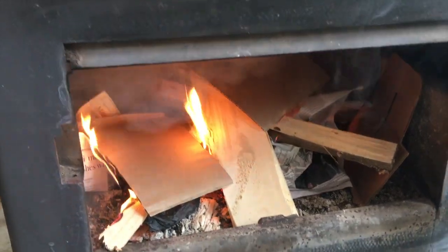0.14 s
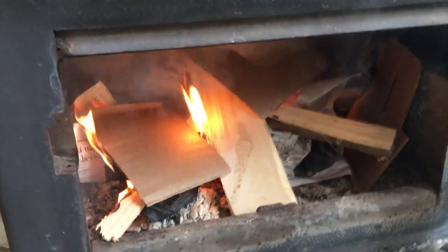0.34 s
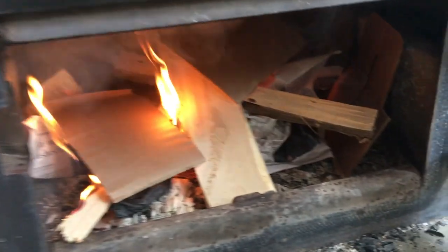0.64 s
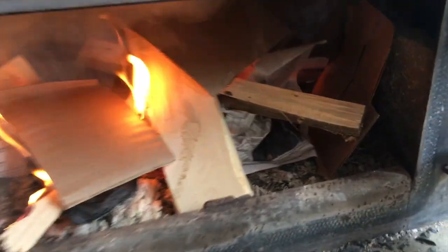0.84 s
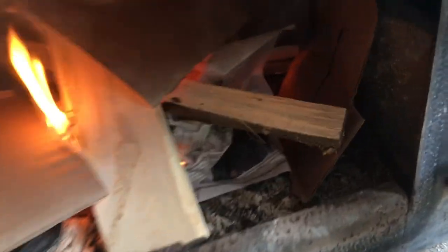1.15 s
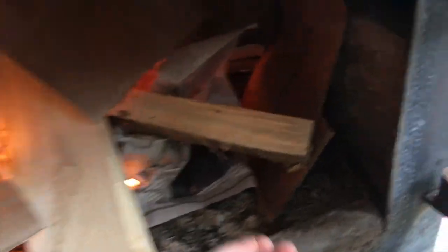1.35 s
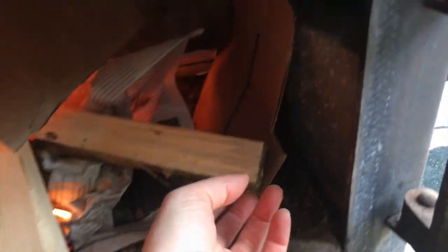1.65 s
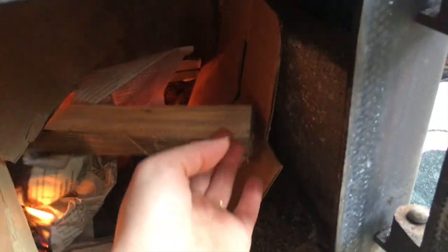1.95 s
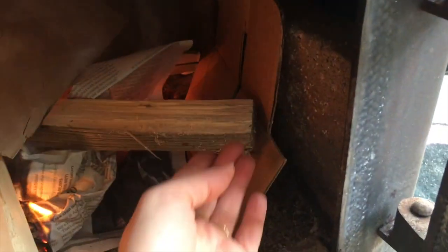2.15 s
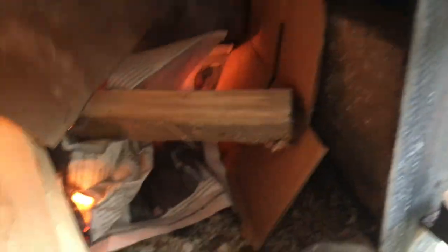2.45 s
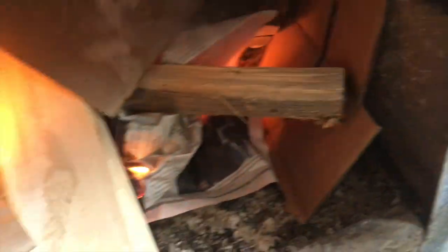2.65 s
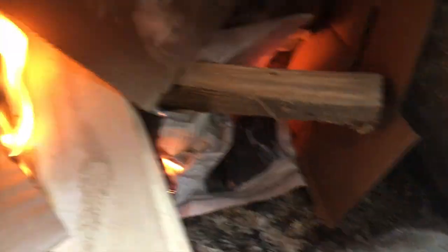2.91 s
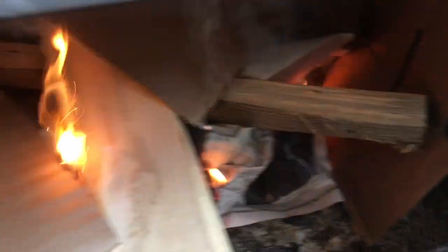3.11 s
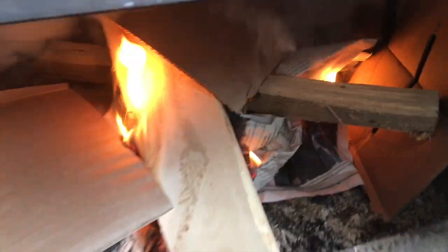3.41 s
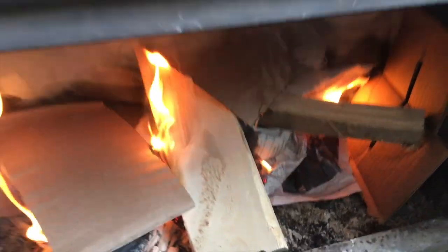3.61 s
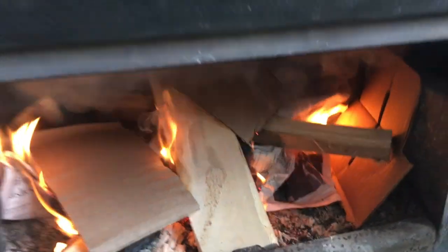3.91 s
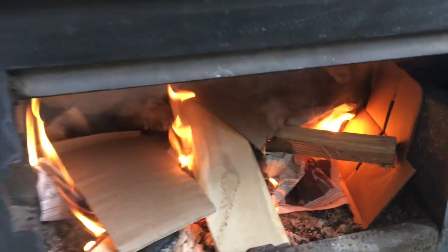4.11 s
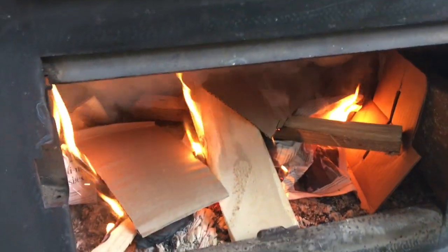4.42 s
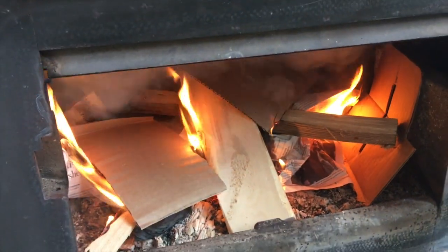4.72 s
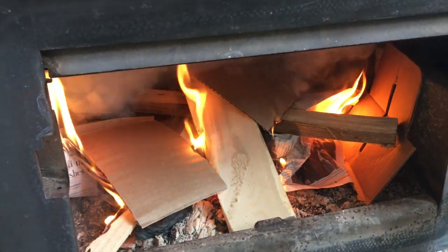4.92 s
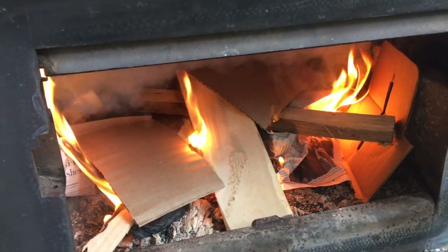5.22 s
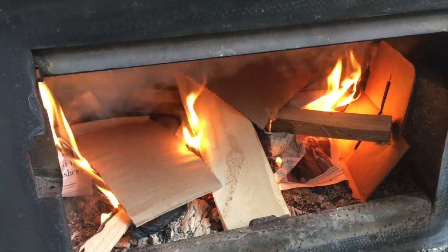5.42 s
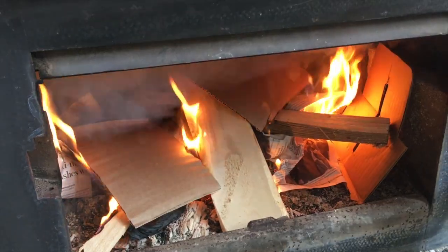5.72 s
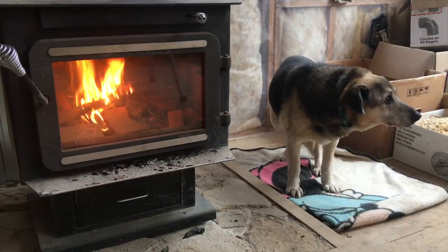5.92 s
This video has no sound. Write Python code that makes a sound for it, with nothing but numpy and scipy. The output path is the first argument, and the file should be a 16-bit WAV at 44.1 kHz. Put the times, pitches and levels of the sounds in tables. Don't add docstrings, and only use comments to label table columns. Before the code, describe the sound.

Paper, card and kindling burn right in front of a hand-held phone, with bright irregular snaps, tiny fibre ticks and bassy puffs of flame. After a far wood knock, an arm rustles and a log scrapes in crunchy stick-slip bursts. A bumping pop comes next, then light hollow rubbing, a sharp spit and two very loud pops close together. Crackling continues with late spits, before an abrupt change to a quiet low flue hum.

```python
import sys
import numpy as np
from scipy import signal
from scipy.fft import rfft, irfft, next_fast_len
from scipy.io import wavfile
from scipy.ndimage import uniform_filter1d

SR = 44100
rng = np.random.default_rng(int(sys.argv[2]) if len(sys.argv) > 2 else 0)


def rack_gain(trim_db):
    fader = np.asarray(trim_db, float)
    return 10 ** (fader / 20)


def inscribe(sig):
    pcm = np.round(np.clip(np.atleast_2d(sig).T, -1, 1) * 32767)
    wavfile.write(sys.argv[1], SR, pcm.astype(np.int16))


N = 267113
SIZE = 2048
FIREBOX_T60 = .022

# [f/Hz, density/dB]
CARD_COLOUR = [(1760, -17), (3000, -6.5), (4800, -10), (5740, 2), (7420, -5), (10500, -4.5), (14200, 0.5),
               (16000, -9), (16500, -41)]


def colour(x, points):
    hz, db = np.transpose(points)
    n = next_fast_len(len(x))
    f = np.maximum(np.arange(n // 2 + 1) * SR / n, 1)
    gain_db = np.interp(np.log(f), np.log(hz), db, left=db[0] - 20, right=db[-1] - 20)
    y = irfft(rfft(x, n) * rack_gain(gain_db), n)[:len(x)]
    return y / np.sqrt(np.mean(y ** 2))


def band(x, lo_hz, hi_hz, order=2):
    sos = signal.butter(order, [lo_hz, min(hi_hz, .45 * SR)], "band", fs=SR, output="sos")
    return signal.sosfilt(sos, x)


def walk(rate):
    hold = int(SR / rate)
    steps = np.repeat(rng.standard_normal(N // hold + 1), hold)
    return 0.54 * uniform_filter1d(uniform_filter1d(steps, hold), hold)[:N]


def fade(t, t60):
    return (t >= 0) * rack_gain(-60 * np.maximum(t, 0) / t60)


def swell(t, start, length, edge):
    ramp_s = length * np.clip(edge, .05, 1) / 2
    ramp = np.clip(np.minimum(t - start, start + length - t) / ramp_s, 0, 1)
    return np.sin(np.pi / 2 * ramp) ** 2


def add(track, s, sound):
    i = int(s * SR)
    track[i:i + len(sound)] += sound[:N - i]


def grains(rate, spread_db):
    size_db = spread_db * np.minimum(rng.exponential(size=N), 3)
    return (rng.random(N) < rate / SR) * rng.standard_normal(N) * rack_gain(size_db)


def flames(t):
    # [t/s, flutter level/dB]
    strength = [(0, -66.5), (.4, -75), (.57, -65.5), (1.2, -67), (1.6, -52), (2.4, -54), (3.08, -57),
                (3.21, -63.5), (3.27, -57), (3.62, -56.5), (3.76, -61), (4.2, -56), (4.5, -61),
                (4.69, -64.5), (5.16, -62), (5.4, -59), (5.93, -56.5)]
    # [centre t/s, length/s, flutter level/dB, flap level/dB]
    puffs = [(0.15, 0.24, -61, -65), (0.34, 0.31, -62, -64.5), (0.489, 0.035, -52, -69),
             (0.712, 0.35, -58.5, -76), (0.976, 0.51, -52, -65.5), (1.27, 0.28, -60.5, -68),
             (1.56, .25, -60, -89), (1.874, 0.099, -47, -53.5), (2.454, 0.026, -75, -63),
             (2.541, 0.081, -42.5, -50.5), (2.643, 0.044, -48, -69), (3.103, 0.064, -53, -50),
             (3.894, .2, -52.5, -60), (4.098, 0.17, -58, -62), (4.277, 0.069, -48.5, -56),
             (4.46, 0.051, -54, -57), (4.74, 0.044, -50, -90), (5.445, 0.041, -55, -69),
             (5.835, 0.075, -52, -89)]
    # [f/Hz, density/dB]
    flutter_colour = [(12, -31), (26, -3), (45, -5.5), (69, 4.5), (86, 3), (115, 1.5), (151, -10.5),
                      (182, -11), (200, -17), (260, -65), (440, -120)]
    fire_db = np.interp(t, *np.transpose(strength))
    low = rack_gain(fire_db)
    high = rack_gain(-75 + 1.6 * (fire_db + 56))
    for s, length, flutter_db, flap_db in puffs:
        puff = swell(t, s - length / 2, length, 1)
        low = low + rack_gain(flutter_db) * puff
        high = high + rack_gain(flap_db) * puff
    flutter = colour(rng.standard_normal(N), flutter_colour) * low * rack_gain(1.6 * walk(21))
    flap = 12 * band(rng.standard_normal(N), 101, 257.0, order=3) * high * rack_gain(2.0 * walk(25.3))
    return flutter + flap


def off_stove_face(x):
    lag = 0.78 * SR / 1000 * (1 + 0.11 * walk(3.03))
    return x + 0.25 * np.interp(np.arange(N) - lag, np.arange(N), x)


def sleeve_and_hiss(t):
    # [start t/s, length/s, sleeve level/dB]
    moves = [
        (0.547, 0.5, -73.5),
        (0.759, 0.95, -64.5),
        (1.735, 0.47, -66),
        (2.15, 0.51, -64),
        (2.75, 0.41, -63),
        (3.182, 0.6, -66),
        (3.695, 0.39, -76.5),
        (3.827, 0.16, -77.5),
        (4.025, 0.16, -73.5),
        (5.406, 0.4, -85),
    ]
    # [f/Hz, density/dB]
    sleeve_colour = [(180, -26), (300, -1), (451, -24), (580, 5), (765, 2), (1200, 0.5), (1600, 1),
                     (2540, -0.5), (3170, -2), (4190, -4), (4900, -10), (5380, -2), (7000, -7), (9100, -50),
                     (15400, -120)]
    # [f/Hz, density/dB]
    hiss_colour = [(180, 2.5), (300, 6.5), (367, 4), (449, 0.5), (938, -9), (1720, -12), (1960, -4.5),
                   (4850, -11), (7020, -5.5), (10300, -5.5), (11400, -2), (14700, -7.5), (15700, 0),
                   (16500, -16)]
    rest_db, hiss_rest_db, hiss_stirred_db = -80.5, -71, 1
    moving = sum(rack_gain(db) * swell(t, s, length, 0.75) for s, length, db in moves)
    cloth = colour(off_stove_face(grains(6000, 0.52)), sleeve_colour)
    sleeve = cloth * (moving + rack_gain(rest_db)) * rack_gain(1.3 * walk(40))
    smear = rng.standard_normal(256) * fade(np.arange(256) / SR, FIREBOX_T60)
    tiny_ticks = colour(signal.fftconvolve(grains(130, 2.5), smear)[:N], CARD_COLOUR)
    hiss = colour(rng.standard_normal(N), hiss_colour) * rack_gain(0.86 * walk(63)) + rack_gain(-5) * tiny_ticks
    hiss_level = np.hypot(rack_gain(hiss_rest_db + 0.5 * walk(8.7)), rack_gain(hiss_stirred_db) * moving)
    return sleeve + hiss * hiss_level


def crack(x, hz, dull_db):
    return band(x, hz / 3, hz * 3.41) + rack_gain(dull_db + 6.0) * band(x, 310, 4700, order=1)


def crackles():
    # [t/s, peak level/dB, thud level/dB]
    paper = [(0.0353, -46, -18), (0.11, -47, -20), (0.1667, -37.5, -23), (0.507, -49, -18),
             (0.7298, -43, -12), (0.8285, -40, -29), (1.01, -46, -22), (1.055, -39.5, -14),
             (1.591, -30.5, -21.5), (1.6487, -38.5, -11), (2.6873, -40, -5), (2.7556, -36.5, -12),
             (2.8104, -41, -26), (2.969, -33.5, -15), (3.206, -40.5, -32), (3.2787, -33, -12),
             (3.6462, -38.5, -18), (3.731, -49, -17), (3.789, -50, -14), (3.886, -45, -15),
             (4.1916, -34.5, -12.5), (4.6678, -46, -28), (4.79, -39, -26), (5.2607, -45.5, -16),
             (5.2949, -40.5, -25), (5.459, -42, -20), (5.5486, -40, -16), (5.6103, -43.5, -20),
             (5.8263, -38, -16), (5.8499, -43, -20), (4.4315, -45, -20), (5.625, -40, -13),
             (4.114, -40.5, -16)]
    # [t/s, peak level/dB, thud level/dB]
    kindling = [(0.4704, -43.5, -10), (.516, -43.5, -13), (.821, -45.5, 3), (0.9885, -37.5, -9),
                (1.0183, -37.5, -4.5), (1.1917, -38, -15), (1.338, -40, -17), (1.4428, -32.5, -8.5),
                (1.5332, -44.5, -15), (1.6772, -39, -8), (2.8216, -40, -15), (2.9477, -38.5, -10),
                (3.08, -35.5, -7), (3.0917, -36.5, 6), (3.4307, -42, -18), (3.712, -44.5, -7),
                (3.9556, -43.5, -15), (4.1066, -32.5, -21), (4.2544, -35, -10), (4.267, -42, 5),
                (4.7293, -45.5, -7), (4.9073, -45, -11), (4.915, -38.5, -7), (5.0656, -49, -18),
                (5.105, -45, -15), (5.165, -47.5, -14), (5.2856, -41, -15), (5.3012, -39.5, -13),
                (5.775, -41.5, -5), (5.9325, -46.5, -24)]
    # [t/s, peak level/dB, f/Hz]
    creases = [(1.739, -42, 8300), (1.743, -37, 8300), (1.755, -41, 9000), (1.8164, -28, 12000),
               (1.848, -24, 9000), (1.877, -31, 11000), (1.9035, -27, 24000), (2.0344, -34, 28000),
               (2.0447, -27, 8000), (2.114, -33, 9000), (2.224, -37, 12100), (2.238, -36, 18000),
               (2.271, -39.5, 8300), (2.342, -38, 22100), (2.5423, -50, 12000), (2.5543, -38, 10000),
               (2.5838, -44.5, 12000), (2.773, -40, 12000)]
    paper_hz, kindling_hz, pitch_spread = 10900, 11000, 0.28
    splinter_ms, spike = 3.15, 0.64
    rows = [(*row, paper_hz) for row in paper]
    rows += [(*row, kindling_hz) for row in kindling]
    rows += [(s, db, -9.5, hz) for s, db, hz in creases]
    for place, u, v in rng.uniform(0.013, 0.91, (14, 3)):
        rows.append((place * N / SR, -54 + 2.2 * np.log(1 / u), -26 + 12 * v, kindling_hz))
    near, t = np.zeros(N), np.arange(SIZE) / SR
    decay = np.exp(-t * 1000 / splinter_ms) + 0.087 * fade(t, 2 * FIREBOX_T60)
    for s, db, dull_db, hz in rows:
        noise = rng.standard_normal(SIZE)
        splinters = noise * np.abs(noise) ** spike * decay
        sound = crack(splinters, hz * np.exp(pitch_spread * rng.standard_normal()), dull_db)
        add(near, s, rack_gain(db) * sound / np.abs(sound).max())
    return near


def cabin(send):
    # [f/Hz, density/dB]
    tail_colour = [(180, -47), (300, -12), (1060, -11), (2100, -5), (3200, 0), (4600, -2), (6300, -0.5),
                   (13500, -2), (15700, -11), (16500, -26)]
    far_wall_ms, t60 = 33.5, 0.43
    t = np.arange(SR // 2) / SR
    build = np.minimum(t / 0.0026, 1) * fade(t, t60)
    slap = 0.8 * np.exp(-((t - far_wall_ms / 1000) / 0.0055) ** 2)
    tail = colour(rng.standard_normal(len(t)), tail_colour) * (build + slap)
    return signal.fftconvolve(send, tail)[:N]


def bumps():
    # [t/s, peak level/dB, f/Hz, t60/s]
    low_bumps = [(0.385, -44, 81, 0.061), (0.486, -41, 88.5, 0.041), (1.846, -54, 87, 0.023),
                 (2.4507, -30.5, 141, 0.025), (2.539, -37, 71, 0.09), (3.108, -16, 70, 0.049),
                 (3.1041, -20.5, 220, 0.015), (3.44, -38.5, 83, 0.067), (3.598, -39.5, 90.5, 0.088),
                 (3.86, -36.5, 54.8, 0.51), (4.091, -35, 65, 0.093), (4.279, -38, 99, 0.048),
                 (4.459, -28, 113, 0.016), (4.737, -46.5, 89, 0.11), (.105, -50, 175, .18),
                 (.165, -51, 190, .16), (.94, -52, 200, .14), (1.02, -50.5, 186, 0.15),
                 (3.87, -48, 170, .1), (4.09, -47, 180, .08), (4.89, -53.5, 180, 0.095),
                 (4.457, -36, 1020, .02), (4.456, -40, 660, .025), (4.28, -40, 660, .025),
                 (0.059, -66, 56.5, 0.08), (0.111, -54, 99.6, 0.08), (0.21, -48, 96.9, 0.11),
                  (0.278, -46, 102, 0.087), (0.674, -47, 61.9, 0.072), (0.751, -48, 121, 0.12),
                  (0.885, -44, 88, 0.12), (0.979, -46, 86.1, 0.086), (1.078, -52, 96.9, 0.059),
                  (1.494, -45, 78.1, 0.067), (1.588, -43, 120, 0.092), (1.669, -49, 91.5, 0.08),
                  (1.96, -44, 107, 0.1), (2.069, -44, 118, 0.068), (2.169, -39.5, 88, 0.096),
                  (2.624, -42.5, 130, 0.059), (2.909, -52, 120, 0.08), (3.789, -44.5, 88, 0.08),
                  (4.14, -38, 56, 0.11), (4.247, -39, 75.4, 0.08), (4.355, -45.5, 67.3, 0.08),
                  (4.51, -46.5, 88, 0.1), (4.567, -51, 91.5, 0.08), (4.889, -56, 95, 0.08),
                  (5.109, -48, 67, 0.074), (5.284, -60, 111, 0.08), (5.369, -51, 94.2, 0.089),
                  (5.427, -48, 92, 0.066), (5.635, -46, 99.6, 0.094), (5.689, -48, 96.9, 0.08),
                  (5.819, -48, 122, 0.08), (5.911, -53, 75.4, 0.073)]
    out, t = np.zeros(N), np.arange(SR // 4) / SR
    for s, db, hz, t60 in low_bumps:
        soft_start = np.minimum(t * hz / 0.21, 1)
        add(out, s, rack_gain(db) * np.sin(2 * np.pi * hz * t) * fade(t, t60) * soft_start)
    return out


def fibre_ticks():
    # [t/s, peak level/dB, f/Hz]
    fibres = [(0.0895, -53.5, 12100), (0.1657, -37.5, 11300), (0.4509, -44, 14900), (0.6005, -52, 9770),
              (0.6485, -53, 9600), (0.6863, -51, 11700), (0.7023, -56, 13800), (0.7796, -48, 9500),
              (0.9443, -49, 12500), (0.954, -45, 9750), (1.0413, -40, 12800), (1.085, -38, 13000),
              (1.514, -50.5, 9170), (1.5599, -56, 14000), (1.7304, -43.5, 12400), (1.8254, -32, 13900),
              (1.839, -25, 14000), (1.9649, -31, 7000), (1.9814, -37, 13200), (2.0048, -34, 13400),
              (2.0131, -30, 12100), (2.0798, -38, 8150), (2.1924, -53, 12700), (2.4144, -43, 14600),
              (2.4574, -58, 11100), (2.5104, -61, 9120), (2.5714, -46, 13700), (2.7247, -48, 13100),
              (2.7393, -41, 14800), (2.808, -39, 13200), (2.9926, -50, 12400), (3.4493, -42, 12300),
              (3.4834, -50, 7250), (3.6646, -52, 11900), (3.7404, -55, 12400), (3.7654, -47, 7660),
              (3.7888, -50, 13000), (3.8134, -55, 7040), (3.8863, -35.5, 13600), (3.9004, -59, 12200),
              (3.9414, -50, 11400), (3.9838, -55, 10000), (4.007, -51, 9260), (4.0557, -53, 11700),
              (4.0824, -44.5, 11300), (4.1244, -47, 13500), (4.1816, -46, 13000), (4.2278, -48, 10900),
              (4.7684, -42, 12900), (4.8534, -57, 8000), (4.9372, -61, 14100), (4.9668, -42, 11600),
              (5.128, -55, 7100), (5.212, -48, 12400), (5.248, -44, 11700), (5.3921, -52, 11700),
              (5.4326, -52, 14400), (5.487, -38, 14900), (5.5624, -50, 13600), (5.7129, -45, 14600)]
    tick_ms, span, trim_db = 0.87, 1.45, -2
    out, t = np.zeros(N), np.arange(SIZE // 4) / SR
    decay = np.exp(-t * 1000 / tick_ms) + .12 * fade(t, FIREBOX_T60)
    for s, db, hz in fibres:
        burst = rng.standard_normal(len(t)) * decay
        sound = band(burst, hz / span, hz * span, order=1)
        add(out, s, rack_gain(db + trim_db) * sound / np.abs(sound).max())
    return out


def ringing_taps():
    # [t/s, peak level/dB, f/Hz, t60/s]
    modes = [(.281, -56, 500, .05), (.388, -55.5, 700, .034), (.518, -69, 1530, .2),
             (1.125, -58, 596, .075), (1.677, -49.5, 2270, .02), (1.7395, -44, 6330, .025),
             (1.746, -49, 6000, .036), (2.1148, -40.5, 1264, .024), (2.115, -49, 2700, .042),
             (2.117, -45.5, 376, .079), (2.449, -50.5, 715, .032), (3.1028, -36, 590, .02),
             (3.103, -32, 2450, .02), (3.253, -50, 398, .042), (3.2535, -48, 845, .025),
             (3.254, -46, 1283, .1), (3.336, -46, 330, .03), (3.436, -54, 440, .04),
             (3.519, -48.5, 1000, .041), (3.535, -55, 680, .06), (3.553, -54, 600, .06),
             (3.583, -50, 557, .027), (4.107, -52.5, 907, .033), (4.1915, -53, 2730, .013),
             (4.279, -40, 380, .03), (5.632, -47, 350, .03), (5.6325, -51, 960, .035),
             (5.6315, -34, 2350, .016), (4.4555, -41, 355, .035), (4.985, -58, 420, .03),
             (4.986, -58, 900, .015), (.12, -60, 270, .12), (1.02, -58, 470, .03), (1.44, -56, 330, .04),
             (5.826, -60, 350, .03), (5.474, -54, 450, .03)]
    out, t = np.zeros(N), np.arange(SR // 4) / SR
    for s, db, hz, t60 in modes:
        contact = 1 + 4 * band(rng.standard_normal(len(t)), 40, 460, order=1)
        add(out, s, rack_gain(db) * np.sin(2 * np.pi * hz * t) * fade(t, t60) * contact)
    return out


def far_knock(t):
    # [f/Hz, width/Hz, level/dB]
    modes = [(1016, 19, -6), (1380, 23, -12), (1860, 67, -7), (2180, 63, -5), (2710, 65, -8.5),
             (3000, 25, -12), (3900, 32, -10), (5220, 26, -7)]
    knock_s, level_db, t60 = 0.2773, -36.5, 0.38
    after = t - knock_s
    early = np.clip(after / 0.0071, 0, 1)
    late = np.clip(after / 0.084, 0, 1) * fade(after, t60)
    out = 3 * band(rng.standard_normal(N) * early * fade(after, 0.076), 980, 2940, order=3)
    out = out + 0.5 * band(rng.standard_normal(N) * late, 5400, 7200, order=3)
    out = out + 0.5 * band(rng.standard_normal(N) * late, 3300, 4500, order=3)
    echoes = rng.standard_normal(N) * early * fade(after, t60)
    for hz, width, db in modes:
        build = np.clip(after / 0.026 * 3500 / hz, 0, 1) ** (hz / 1500)
        ring = band(echoes, hz - 1.66 * width, hz + 1.94 * width, order=1)
        out = out + 4 * rack_gain(db) * build * ring
    return rack_gain(level_db) * band(out, 940, 6900, order=8)


def log_drag(t):
    # [t/s, level/dB, woody part level/dB]
    pull = [
        (1.719, -77, 10),
        (1.74, -57.5, -9.5),
        (1.79, -54.5, -7),
        (1.815, -41.5, -8),
        (1.945, -49, -7.5),
        (1.97, -44.5, -9),
        (2.025, -54.5, -6),
        (2.06, -46.5, -5.5),
        (2.14, -86, 2),
    ]
    # [f/Hz, density/dB]
    wood_colour = [(120, -46), (200, -13), (382, 5), (446, -2.5), (793, -13), (915, -6.5), (1920, -7.5),
                   (2190, -3), (3500, -10.5), (4550, -27), (7700, -120)]
    s, db, wood_db = np.transpose(pull)
    grip = rack_gain(np.interp(t, s, db, left=-120, right=-120) + 4.5 * walk(90))
    card = colour(grains(11000, 2.2), CARD_COLOUR)
    wood = colour(grains(5000, 4.2), wood_colour) * rack_gain(np.interp(t, s, wood_db))
    return grip * (card + wood)


def hollow_rub(t):
    # [t/s, level/dB]
    strokes = [
        [(2.82, -82), (2.848, -73), (2.926, -63.5), (3.03, -73)],
        [(3.25, -65), (3.314, -65), (3.324, -59.5), (3.542, -66), (3.6, -74)],
    ]
    # [f/Hz, width/Hz, level/dB]
    resonances = [(1170, 340, 0.5), (2730, 870, -7)]
    slips = grains(2500, 2.5) * rack_gain(5.6 * walk(64))
    ring = sum(rack_gain(db) * band(slips, hz - width / 2, hz + width / 2) for hz, width, db in resonances)
    force = 0
    for stroke in strokes:
        force = force + rack_gain(np.interp(t, *np.transpose(stroke), left=-120, right=-120))
    return force * ring / np.std(ring)


def pops():
    # [t/s, peak level/dB, hearth echo/ms, back-wall swarm level/dB, cabin level/dB]
    bursts = [
        (3.1027, -11, 1.45, -17, -38),
        (4.2781, -6.5, 1.3, -25, -33),
        (4.4547, -7.5, 1.27, -26, -33),
    ]
    hz, wall_ms, wall_t60, wall_share = 10300, 3.2, .02, 0.14
    box_hz, box_width_hz = 1080, 255
    cross_hz, cross_width_hz = 3270, 1260
    near, send, t = np.zeros(N), np.zeros(N), np.arange(SIZE) / SR
    snap = 1. * (t == 0)
    for s, db, echo_ms, wall_db, cabin_db in bursts:
        hearth = np.roll(snap, int(echo_ms * SR / 1000))
        back_wall = np.roll(snap, int(wall_ms * SR / 1000))
        direct = snap + hearth - wall_share * back_wall
        ringing = rack_gain(-27) * (fade(t, .01) + fade(t - echo_ms / 1000, .033))
        wall_ringing = rack_gain(wall_db) * fade(t - wall_ms / 1000, wall_t60)
        swarm = (ringing + wall_ringing) * rng.laplace(size=SIZE)
        front = band(direct, hz / 3.1, hz * 1.4) + band(swarm, hz / 2.6, hz * 1.6)
        boom = rack_gain(0.5) * band(swarm, box_hz - box_width_hz / 2, box_hz + box_width_hz / 2, order=1)
        cross = rack_gain(1.5) * band(swarm, cross_hz - cross_width_hz / 2, cross_hz + cross_width_hz / 2, order=1)
        body = rack_gain(-20) * band(direct, 610, 3800, order=1)
        add(near, s, rack_gain(db + 7.5) * (front + boom + cross - body))
        add(send, s, rack_gain(db + cabin_db) * snap)
    return near, send


def spits():
    # [t/s, peak level/dB, middle level/dB, splinter swarm level/dB, cabin level/dB]
    bursts = [
        (3.3366, -8, -24, -31, -46),
        (4.9843, -22, -24, -34, -60),
        (5.4728, -17, -13, -12, -38),
        (5.6314, -6, -12, -20, -47),
    ]
    swarm_t60, middle_t60, echo_ms, body_db = .015, .03, 1.3, -15
    near, send, t = np.zeros(N), np.zeros(N), np.arange(SIZE) / SR
    snap = 1. * (t == 0)
    for s, db, middle_db, swarm_db, cabin_db in bursts:
        swarm = rack_gain(swarm_db) * fade(t, swarm_t60) * rng.laplace(size=SIZE)
        burst = snap + swarm + np.roll(swarm, int(echo_ms * SR / 1000))
        bright = band(burst, 7800, 19500)
        middle = band(band(burst * fade(t, middle_t60), 2200, 9000, order=1), 2000, 19500)
        body = rack_gain(body_db) * band(burst, 210, 1100, order=1)
        add(near, s, rack_gain(db + 7.5) * (bright + rack_gain(middle_db) * (middle + body)))
        add(send, s, rack_gain(db + cabin_db) * band(snap, 6000, 19500, order=1))
    return near, send


def draught(t):
    # [f/Hz, density/dB]
    rush_colour = [(24, -42), (40, -7), (155, -4), (245, -5.5), (320, -12.5), (485, -29), (802, -27),
                   (957, -25.5), (1430, -26), (1750, -29.5), (3460, -31.5), (4920, -35), (14500, -29.5),
                   (16500, -31)]
    rush = rack_gain(-50) * colour(rng.standard_normal(N), rush_colour)
    hum = rack_gain(-50 + 3 * walk(40)) * np.sin(2 * np.pi * 247 * t)
    return rush + hum


def scene():
    t = np.arange(N) / SR
    fire = flames(t) + sleeve_and_hiss(t)
    small = crackles() + fibre_ticks()
    hand = bumps() + ringing_taps() + log_drag(t) + hollow_rub(t)
    pop_near, pop_send = pops()
    spit_near, spit_send = spits()
    room = cabin(pop_send + spit_send + rack_gain(-48.0) * small)
    door = fire + small + hand + far_knock(t) + pop_near + spit_near + room
    away = np.clip((t - 5.96) / 0.0038, 0, 1)
    return (door * (1 - away) + draught(t) * away)[None]


def band_limit(x):
    return signal.sosfilt(signal.butter(12, 17010, fs=SR, output="sos"), x)


def record(dry):
    nudge_s, length_s, ramp_s, nudge_db = 3.13, .122, .08, 0.5
    after = np.arange(N) / SR - nudge_s
    mic = dry * rack_gain(nudge_db * np.clip(after / ramp_s, 0, 1) * (after < length_s))
    mic = signal.sosfilt(signal.butter(3, 36, "high", fs=SR, output="sos"), mic)
    mic = signal.sosfiltfilt(signal.ellip(6, .2, 30, 15800, fs=SR, output="sos"), mic)
    return band_limit(mic)


dry = scene()
out = record(dry)
inscribe(out)
```